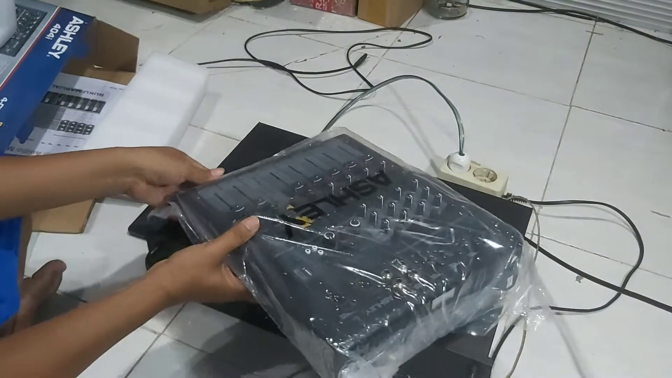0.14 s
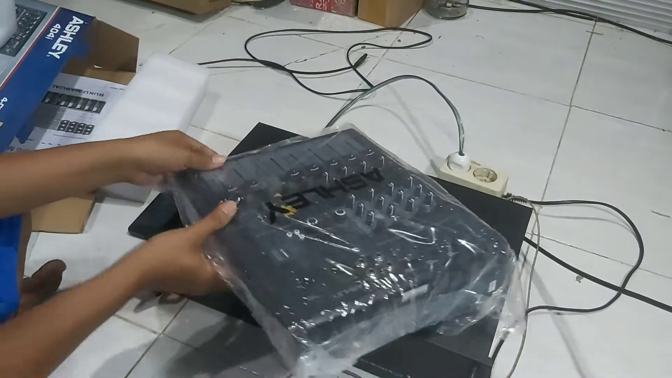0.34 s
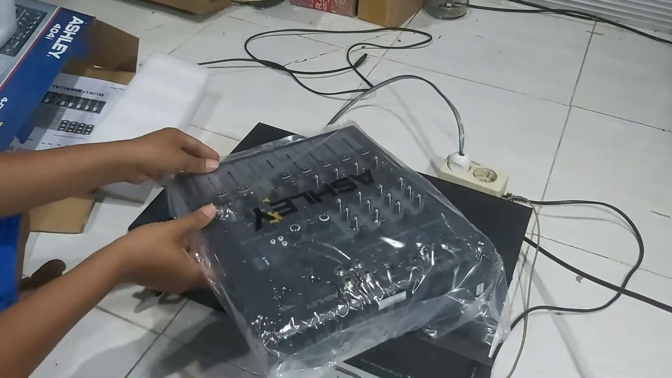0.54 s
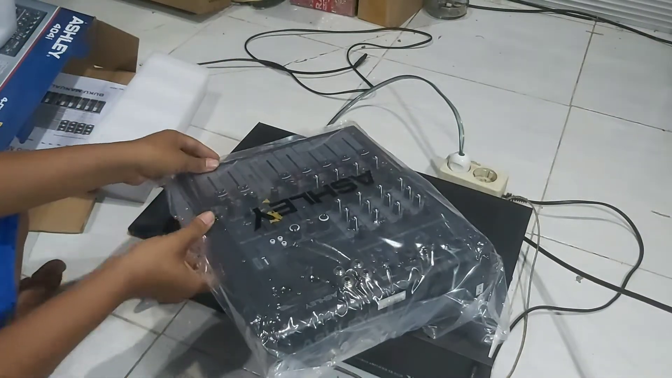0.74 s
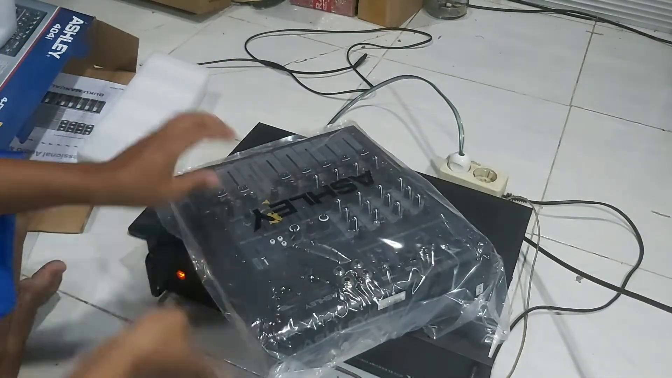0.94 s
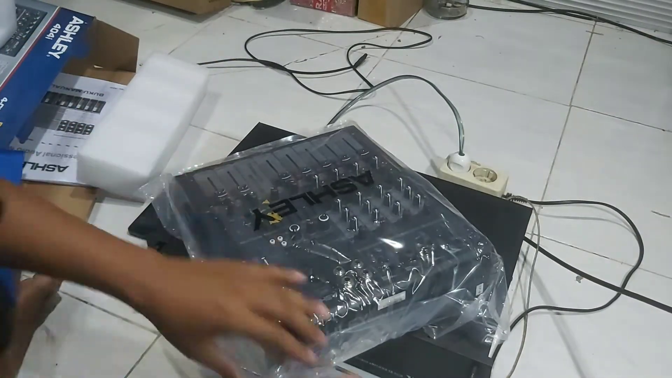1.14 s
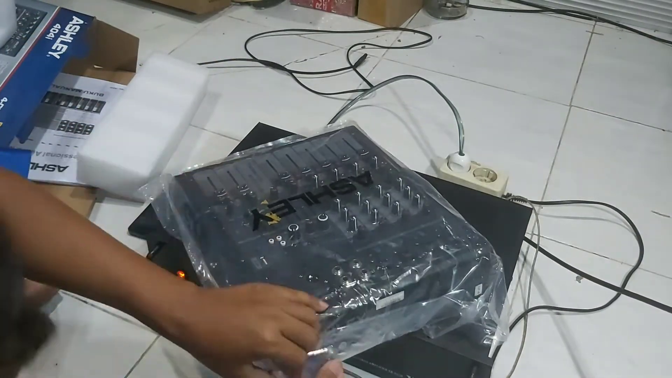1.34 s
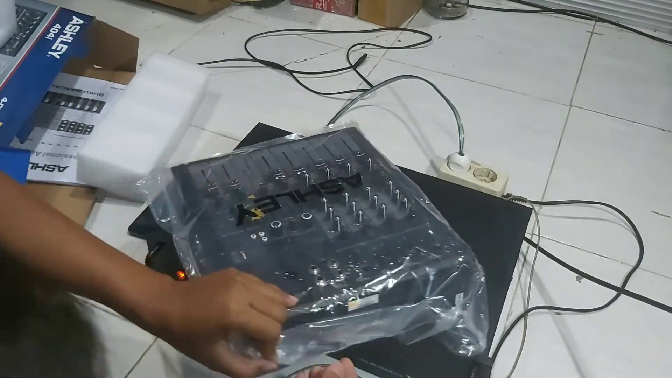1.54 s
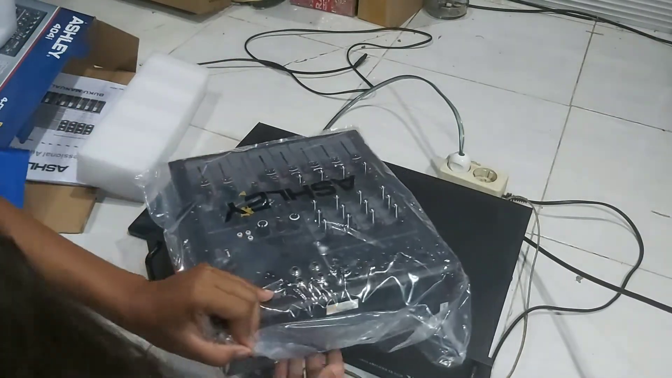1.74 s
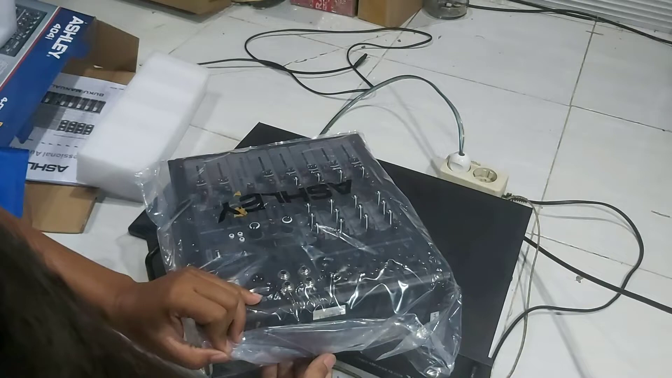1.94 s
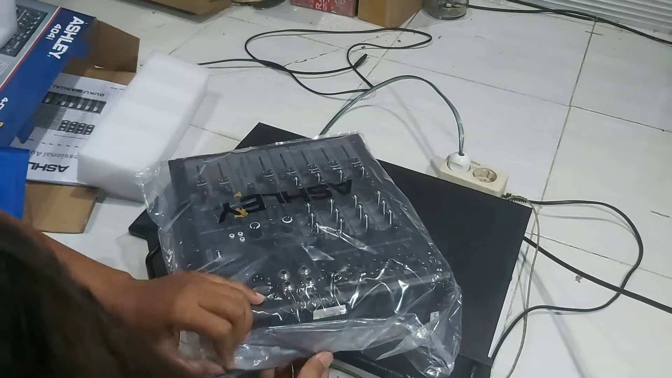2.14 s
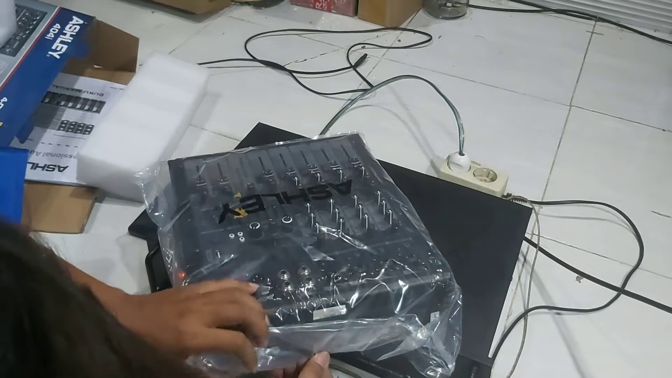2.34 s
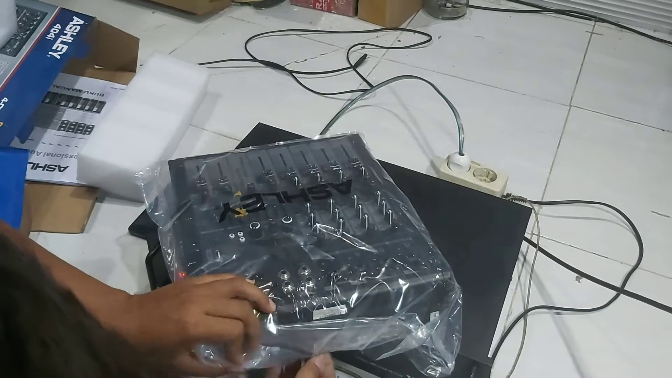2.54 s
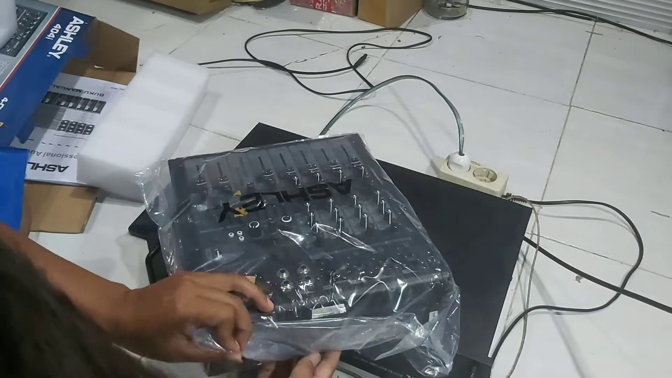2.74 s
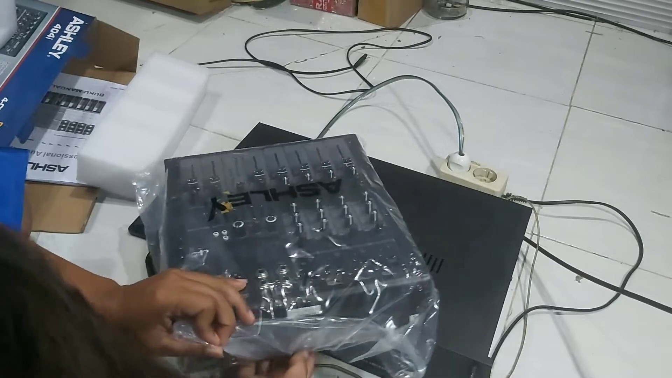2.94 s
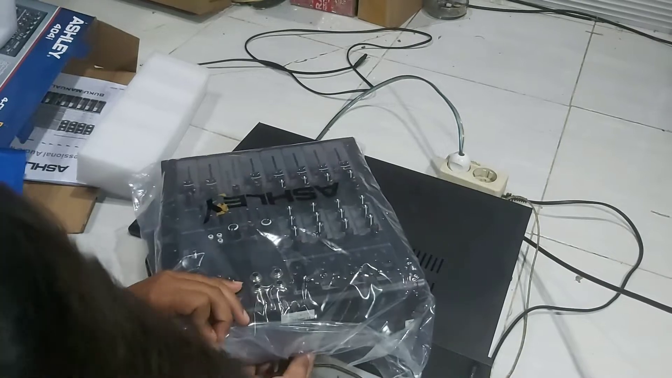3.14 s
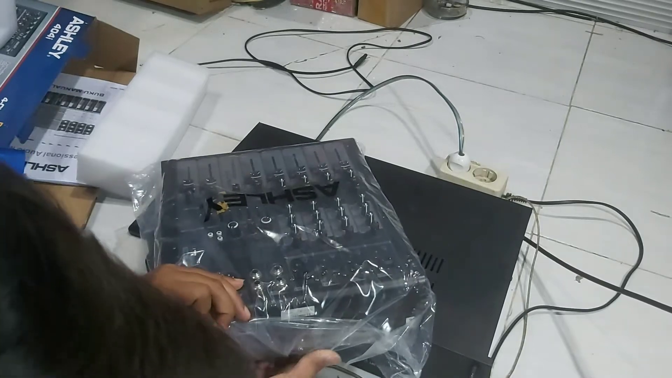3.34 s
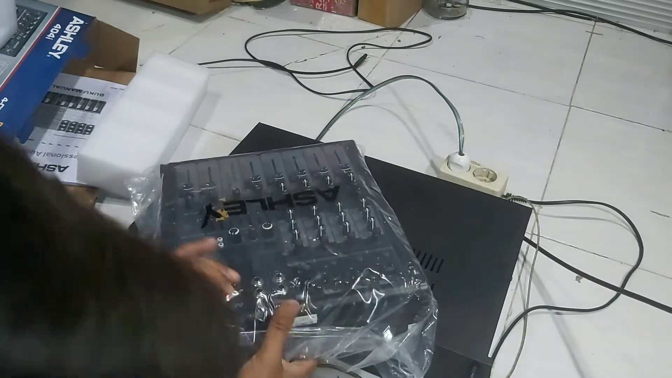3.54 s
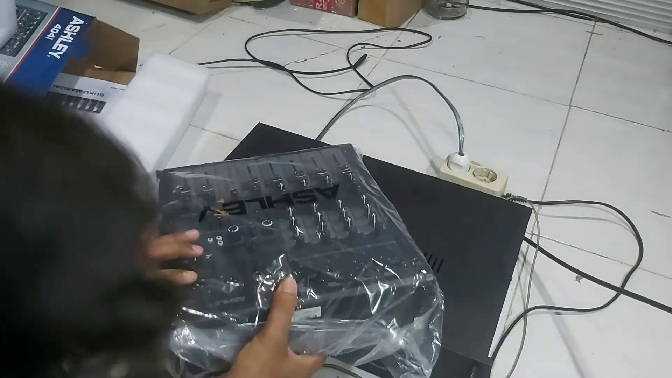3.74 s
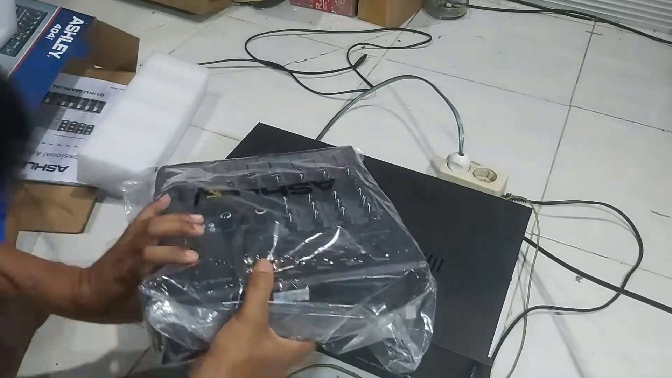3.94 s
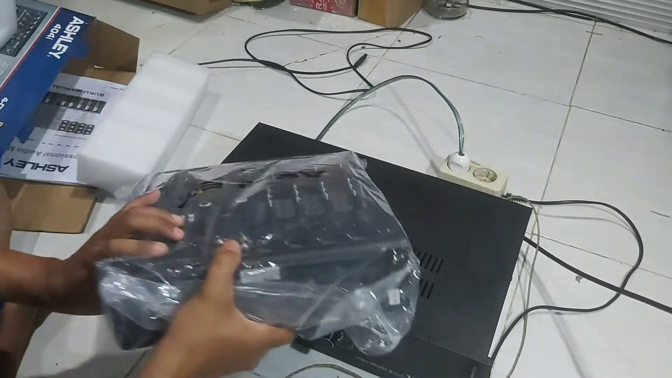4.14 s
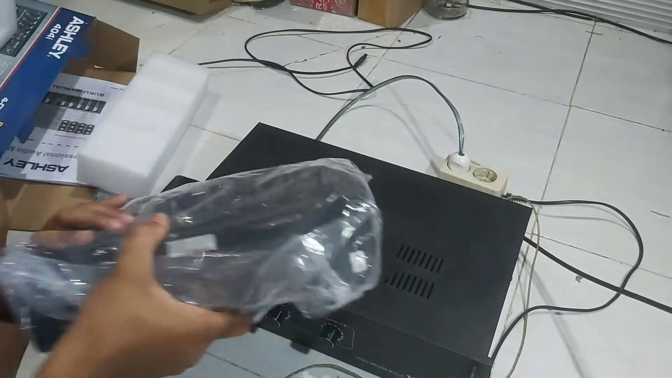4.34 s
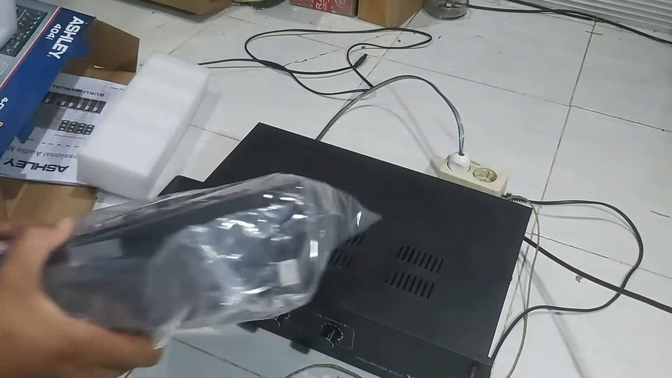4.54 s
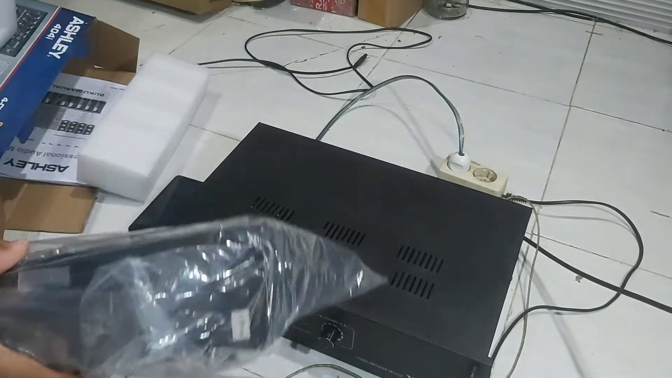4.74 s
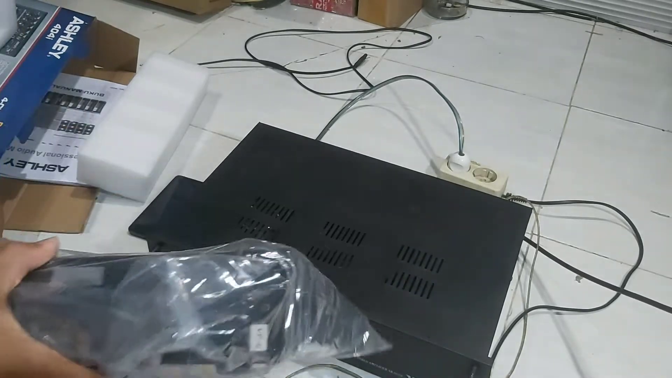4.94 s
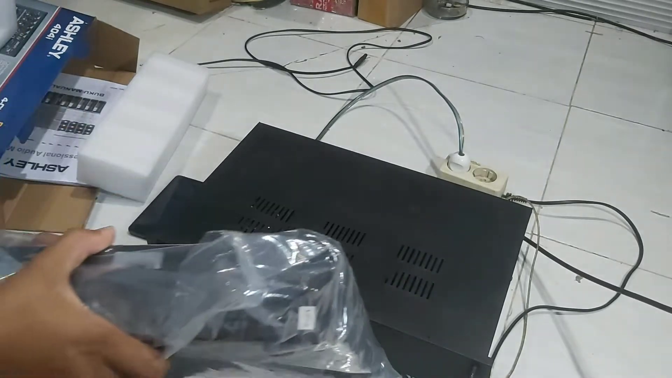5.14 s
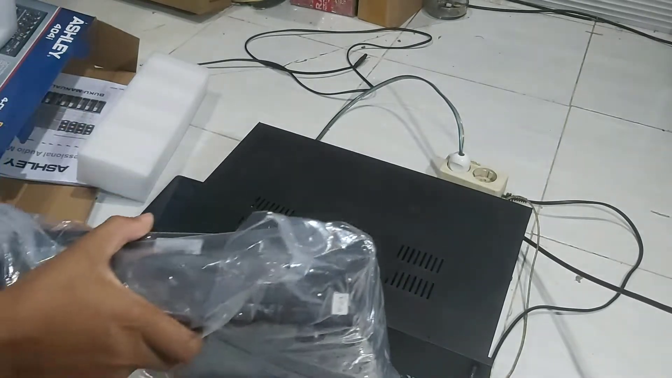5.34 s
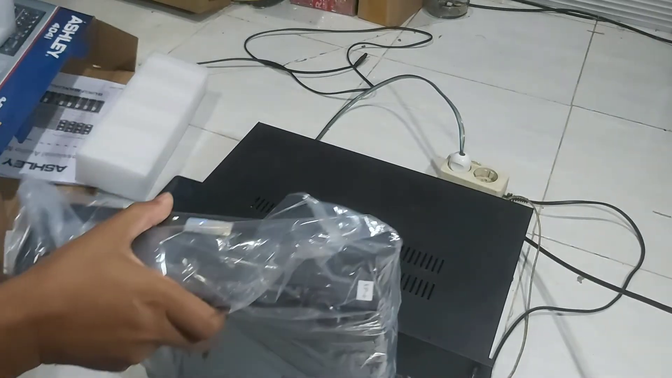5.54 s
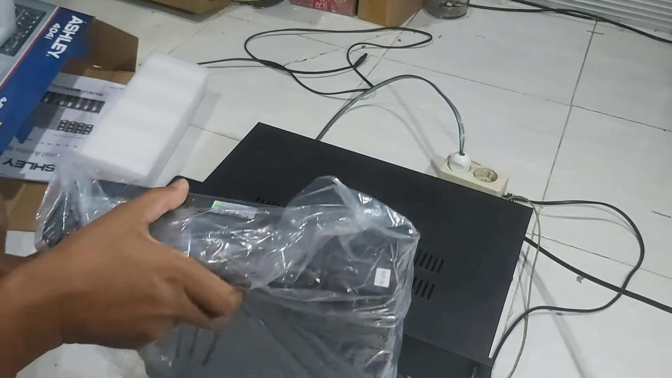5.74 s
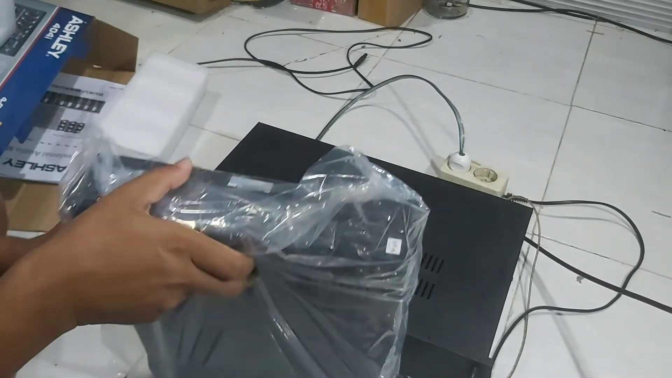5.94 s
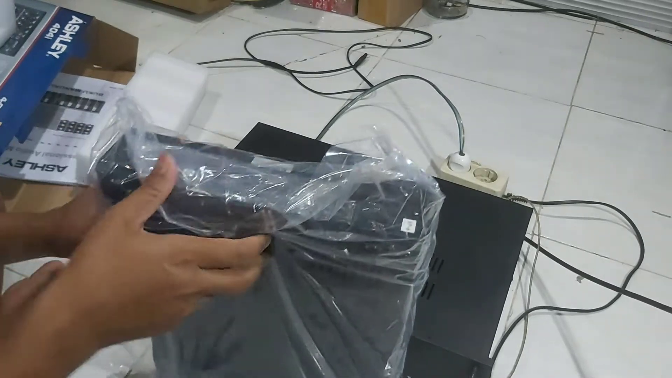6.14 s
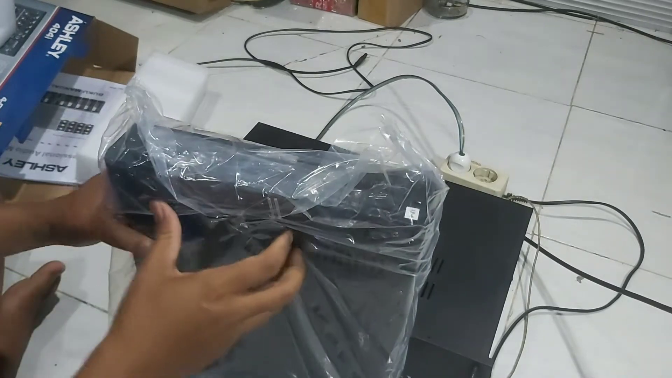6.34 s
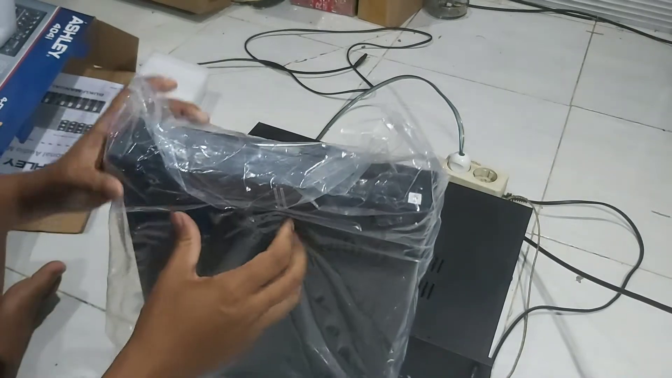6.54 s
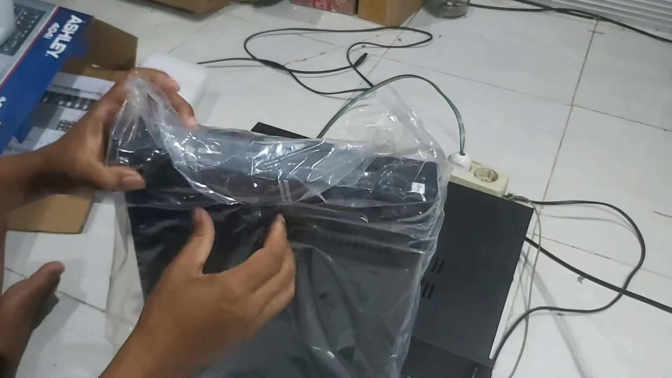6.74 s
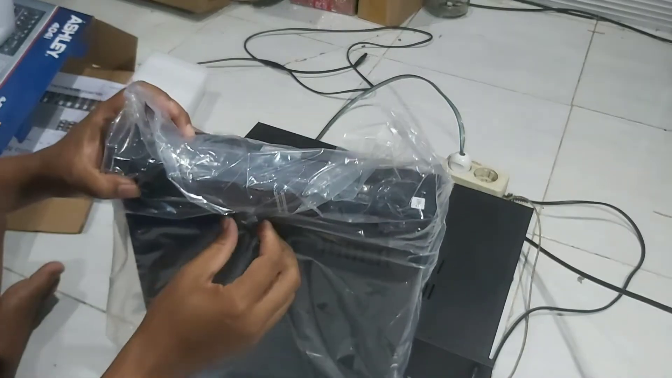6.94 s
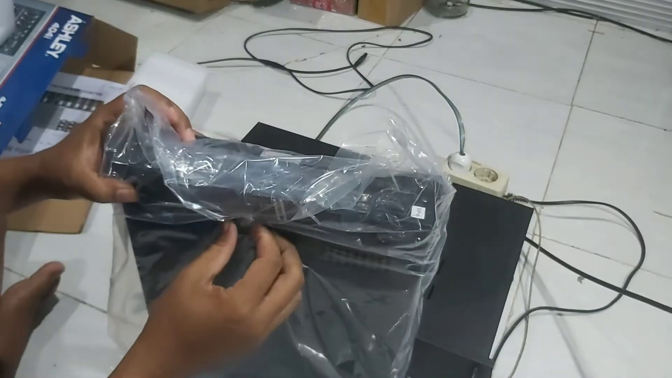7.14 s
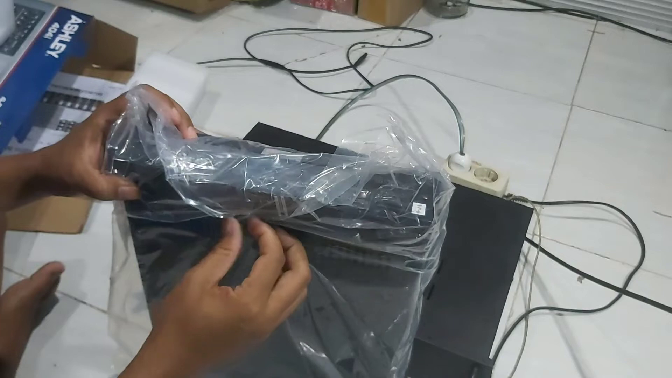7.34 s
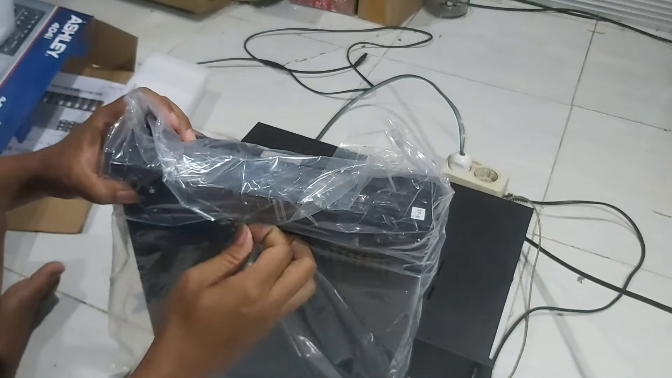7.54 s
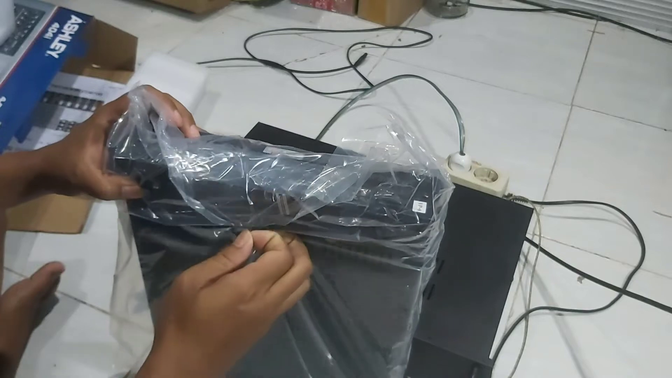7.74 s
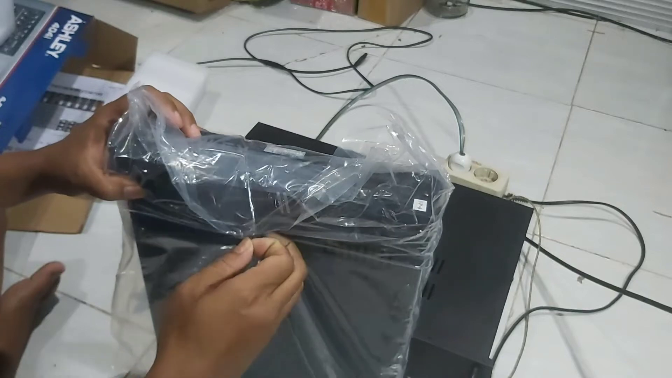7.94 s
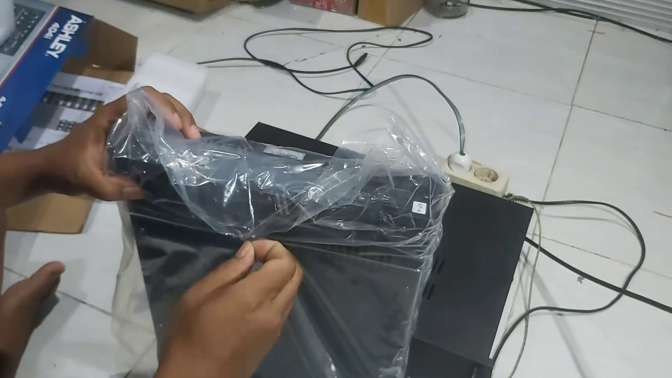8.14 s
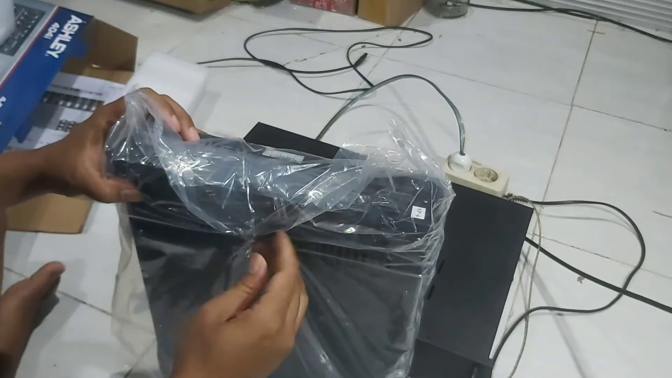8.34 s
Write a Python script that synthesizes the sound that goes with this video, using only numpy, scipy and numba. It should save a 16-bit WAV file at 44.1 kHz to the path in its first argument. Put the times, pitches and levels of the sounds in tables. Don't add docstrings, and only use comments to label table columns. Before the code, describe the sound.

In a small hard-floored room, a heavy box in loose plastic drags and thumps on ringing sheet metal. Dense crinkling comes in uneven clumps with sharp single pops. Several knocks cluster in the middle, with soft low thuds beneath them; afterwards mostly light crackling and ticks remain, with a few muted bumps. A low, wavering fan tone sits behind, picked up by a nearby phone in stereo.

```python
import sys
import numpy as np
from scipy import signal
from scipy.fft import rfft, irfft
from scipy.io import wavfile
from scipy.ndimage import uniform_filter1d
from numba import njit

SR = 44100
rng = np.random.default_rng(int(sys.argv[2]) if len(sys.argv) > 2 else 0)


def invert_db(level):
    return 10 ** (np.asarray(level, dtype=float) / 20)


def to_wav(s):
    ch = np.atleast_2d(s).T
    pcm = np.round(np.clip(ch, -1, 1) * 32767)
    wavfile.write(sys.argv[1], SR, pcm.astype(np.int16))


N = 370440
T = np.arange(N) / SR
STILL_CASING_DB, STILL_FILM_DB = -42, -69


def shape(x, table, scale=1):
    hz, db = np.transpose(table)
    size = x.shape[-1]
    f = np.maximum(np.arange(size // 2 + 1) * SR / size, 1)
    gain = invert_db(scale * np.interp(np.log(f), np.log(hz), db))
    return irfft(rfft(x) * gain, size)


def band(x, lo_hz, hi_hz):
    sos = signal.butter(2, [lo_hz, min(hi_hz, .48 * SR)], "bandpass", fs=SR, output="sos")
    return signal.sosfilt(sos, x)


def unit(x):
    return x / np.sqrt(np.mean(x ** 2))


# f/Hz, likeness [0-1]
PORT_LIKENESS = [(60, 0.8), (130, 0.87), (290, 0.78), (640, 0.49), (1410, 0.06), (3100, 0.06), (6820, 0),
                 (15000, 0.15)]


def pair(size):
    hz, likeness = np.transpose(PORT_LIKENESS)
    likeness = np.clip(likeness, 0, .99)
    mid, side = rng.standard_normal((2, size))
    mid = shape(mid, np.c_[hz, 10 * np.log10(1 + likeness)])
    side = shape(side, np.c_[hz, 10 * np.log10(1 - likeness)])
    return np.array([mid + side, mid - side]) / np.sqrt(2)


def walk(rate):
    hold = int(SR / rate)
    steps = np.repeat(rng.standard_normal(N // hold + 1), hold)
    return 1.323 * uniform_filter1d(uniform_filter1d(steps, hold), hold)[:N]


def swells(rows, rest_db, t):
    s, db, rise, fall = np.transpose(rows)[:, :, None]
    away = np.where(t < s, (s - t) / np.abs(rise), (t - s) / np.abs(fall))
    move_power = invert_db(2 * (db - 20 * away ** 1.18)).sum(0)
    return 10 * np.log10(invert_db(2 * rest_db) + move_power)


@njit
def rings(start, hz, t60, size, phase):
    out = np.zeros(N)
    for k in range(len(start)):
        turn = np.exp(2j * np.pi * hz[k] / SR - np.log(1000) / (t60[k] * SR))
        z = size[k] * np.exp(1j * phase[k])
        for i in range(max(int(start[k]), 0), min(int(start[k] + t60[k] * SR) + 1, N)):
            out[i] += z.real
            z *= turn
    return out


# t/s, peak level/dB, centre f/Hz, ring time/s
BUMPS = [(0.0, -19.5, 302, 1), (0.607, -4, 353, 0.28), (1.259, -25.5, 550, 0.27), (1.995, -17, 283, 0.18),
         (2.173, -29, 288, 0.35), (2.942, -9, 450, 0.28), (3.576, -10.5, 600, 0.17), (3.6, -26, 280, 0.44),
         (3.742, -16, 590, 0.19), (3.954, -24.5, 340, 0.72), (4.443, -15, 300, 0.27),
         (4.458, -11, 460, 0.76), (5.347, -25, 1400, 0.14), (5.355, -19, 159, 0.23), (3.0, -20, 420, 0.36),
         (6.161, -18.5, 666, 0.23), (0.612, -11.5, 1000, 0.19), (4.443, -16, 1040, .25),
         (4.22, -22.5, 590, 0.38), (7.855, -26.5, 334, 0.17)]
# f/Hz, level/dB, relative ring time
CASING_MODES = [(160, 2.5, 0.89), (190, 0.5, 0.84), (253.3, -10.5, 1.5), (283, 0.5, 2.7), (305.2, 3, 1.5),
                (337.7, 3.5, 1.98), (355.4, 4, 0.88), (391, 10, 0.24), (437.3, 3.5, 1.07), (484, -1, 0.57),
                (532.4, 1, 1.8), (577, 3.5, 0.56), (638, 4, 0.34), (696, 6, 0.36), (730, 8.5, 0.32),
                (825, -7, 0.53), (860, -40, 0.19), (1060, -34, 0.12), (1100, -0.5, 1), (1290, 2, 0.89),
                (1598, -3, 0.96), (1870, 7.5, 0.23)]


def bumps():
    hz, mode_db, ring = np.transpose(CASING_MODES)
    contact_s = 0.00775
    out = np.zeros(N)
    for (s, db, centre_hz, t60), chance in zip(BUMPS, rng.random((len(BUMPS), 2, len(hz)))):
        start = (s + chance[0] * contact_s) * SR
        detuned_hz = hz * (1 + 0.024 * (chance[1] - .5))
        near_db = -6.0 * np.abs(np.log2(hz / centre_hz))
        size = invert_db(db + mode_db + near_db - 11.0)
        out += rings(start, detuned_hz, 0.43 * t60 * ring, size, 0 * hz - np.pi / 2)
    return out


# t/s of most pressure, drag level/dB, rise/s, fall/s
SLIDES = [(0, -24, .1, 0.31), (.4, -33.5, 1, 1), (.63, -17, 0.041, 0.15), (1.46, -32, 0.21, 0.43),
          (2.2, -35.5, 0.95, 0.23), (2.58, -36, 0.16, 0.45), (2.96, -25, 0.083, 0.23),
          (2.85, -31.5, 0.12, .15), (3.62, -22, 0.068, 0.18), (4.25, -23.5, 0.19, 0.18),
          (4.5, -23.5, 0.12, 0.35), (5.4, -44, 0.15, 0.69), (6.6, -33.5, 0.44, 0.19)]


def drag():
    hz, mode_db, ring = np.transpose(CASING_MODES)
    scrape = rng.standard_normal(N) * invert_db(2.75 * walk(30))
    poles = np.exp(2j * np.pi * hz / SR - np.log(1000) / (0.17 * ring * SR))
    rub = np.zeros(N)
    for db, pole in zip(mode_db, poles):
        rub += invert_db(db) * signal.lfilter([1], [1, -pole], scrape).imag
    low_scuff = invert_db(-3) * unit(band(band(scrape, 390, 1025), 390, 1025))
    high_scuff = invert_db(-15.5) * unit(band(scrape, 990, 2350))
    pressure_db = np.interp(T, T[::100], swells(SLIDES, STILL_CASING_DB, T[::100]))
    return invert_db(pressure_db - 4.0) * (unit(band(rub, 140, 970)) + low_scuff + high_scuff)


# t/s, level/dB, f/Hz, ring time/s
PANELS = [(0.6, -6, 300, 0.3), (0.61, -10, 441.4, 0.18), (.68, -18, 365, 0.3), (1.98, -20, 284, 0.2),
          (2.13, -29, 280, 0.14), (2.96, -10, 288, 0.15), (3.585, -14, 283, 0.39),
          (3.645, -13.5, 278, 0.29), (3.637, -20, 430, 0.17), (3.05, -25.5, 335, 0.45),
          (3.579, -21.5, 190, 0.13), (.69, -23, 253, 0.72), (2.97, -19, 255, .3), (4.47, -23, 290, .9),
          (.01, -19.5, 305, .5), (3.744, -17.5, 700, 0.1), (3.744, -18, 530, 0.069), (4.52, -18, 332, 0.32),
          (4.215, -21, 468, 0.38), (4.225, -23, 750, .25), (4.24, -18, 338.5, 0.31), (4.235, -23, 545, .3),
          (4.441, -18, 160, 0.2), (4.462, -14.5, 342, .6), (4.462, -17.5, 572, 0.25),
          (5.3, -24.5, 157, 0.13), (6.161, -21.5, 660, 0.064), (6.161, -25.5, 334.6, 0.18),
          (6.531, -29.5, 331, 0.33)]


def panels():
    s, db, hz, t60 = np.transpose(PANELS)
    return band(rings(s * SR, hz, t60, invert_db(db), 0 * s - np.pi / 2), 130, 1030)


def casing():
    struck = bumps() + panels()
    return band(band(struck, 110, 5300), 89, 6000) + drag()


# f/Hz, level/dB per Hz
FILM_COLOUR = [(400, 13.5), (1200, 4.5), (2000, 0.5), (4000, -6.5), (6000, -13), (7500, -25), (10000, -19),
               (12200, -7.5), (15000, -13), (16500, 5.5)]
# from f/Hz, to f/Hz, level/dB
FOLD_BANDS = [
    (431, 1570, -8.5),
    (1500, 2650, -7.5),
    (2404, 3980, -8),
    (4210, 6720, -8.5),
    (6114, 10250, -12.5),
    (10200, 14950, -12),
]


def creases(s, db, tilt_db, ring_hz, pan_db):
    at = np.clip((s * SR).astype(int), 0, N - 1)
    noise, out = shape(pair(N), FILM_COLOUR), 0
    for lo_hz, hi_hz, share_db in FOLD_BANDS:
        octave = np.log2(np.sqrt(lo_hz * hi_hz) / 3100)
        ring_db = 9.0 * np.exp(-(np.log2(ring_hz / 3100) - octave) ** 2 / 0.62)
        crease_db = db + share_db + tilt_db * octave + ring_db
        power = np.zeros((2, N))
        for side in (0, 1):
            np.add.at(power[side], at, invert_db(2 * crease_db + (2 - 2 * side) * pan_db))
        tick, burst = (signal.lfilter([1], [1, -np.exp(-1000 / (ms * SR))], power)
                       for ms in (0.11, 2.77))
        envelope = np.sqrt(tick + invert_db(-26) * burst)
        crackle = envelope * unit(band(noise, lo_hz, hi_hz))
        out = out + band(crackle, 0.91 * lo_hz, 1.015 * hi_hz)
    return out


# t/s of most strain, rustle level/dB, rise/s, fall/s
GRIPS = [(0, -30.5, .1, 0.078), (.274, -30, 0.39, 0.46), (.47, -34, 0.18, .2), (1.7, -34.5, 0.41, 0.2),
         (.595, -23.5, 0.13, 0.085), (.958, -47.5, 0.26, 0.1), (1.272, -33, 0.041, 0.44),
         (1.445, -28.5, 0.2, 0.28), (5.03, -37, 0.13, 0.085), (2.195, -29, 0.068, 0.14),
         (2.62, -34.5, 0.23, 0.25), (2.93, -24.5, 0.061, 0.19), (3.04, -36, 0.21, 0.063),
         (3.377, -36.5, 0.11, 0.041), (3.607, -28, 0.088, 0.2), (3.976, -31, 0.7, 0.37),
         (4.3, -32.5, 0.079, 0.13), (4.445, -26.5, 0.057, 0.18), (4.7, -41.5, 0.44, 0.079),
         (5.2, -51, 0.26, 0.14), (3.25, -55, .1, 0.22), (2.86, -31, 0.078, 0.28),
         (4.95, -34.5, 0.073, 0.15), (1.98, -37.5, 0.22, 0.14), (5.276, -37.5, 0.01, 0.14),
         (5.403, -35, 0.08, 0.076), (5.532, -35, 0.041, 0.33), (5.7, -37, 0.15, 0.068),
         (5.907, -32.5, 0.035, 0.3), (6.181, -39.5, 0.31, 0.1), (6.74, -30.5, 0.55, 0.18),
         (7.1, -48.5, 0.32, 0.31), (7.34, -45, .02, 0.41), (7.39, -43.5, 0.044, 0.19),
         (7.638, -40.5, 0.061, 0.36), (7.917, -35.5, 0.22, 0.17), (8.092, -35.5, 0.077, 0.056),
         (8.266, -29, 0.063, 0.047)]


def rustle(count=8000):
    chance = rng.random((count, 5)).T
    s = chance[0] * N / SR
    clump_db = 2.5 * walk(40)[(s * SR).astype(int)]
    size_db = np.minimum(clump_db - 3.6 * np.log(1 - chance[1]), 8.5)
    pressure_db = swells(SLIDES, STILL_CASING_DB, s) - STILL_CASING_DB
    tilt_db = -1.5 - .13 * pressure_db + 6 * (chance[2] - .5)
    db = swells(GRIPS, STILL_FILM_DB, s) + size_db - 1.0
    ring_hz = 900 * 2 ** (4.8 * chance[3])
    return s, db, tilt_db, ring_hz, 8 * (chance[4] - .5)


# t/s, level/dB
FAN_LEVEL = [
    (0, -69),
    (3.3, -56),
    (3.7, -34.5),
    (4.4, -42),
    (6, -46),
    (8.4, -45.5),
]
# f/Hz, level/dB per Hz
AIR_COLOUR = [(18, -43), (30, 1.5), (76, -10), (190, -10), (323, -2), (467, -8), (624, -11.5), (928, -15),
              (1120, -8.5), (1450, -26), (3860, -78), (8750, -77), (15200, -33), (16500, -64)]


def fan():
    blade_hz = 335 + 1.806 * walk(30)
    phase = 2 * np.pi * np.cumsum(blade_hz) / SR
    level = invert_db(np.interp(T, *np.transpose(FAN_LEVEL)) + 1.5 + 0.89 * walk(13))
    tone = level * (np.sin(phase) + invert_db(-11.0) * np.sin(2 * phase))
    air = invert_db(-44.5 + 1.0 * walk(2.76)) * unit(shape(pair(N), AIR_COLOUR))
    return tone + air


# t/s, peak level/dB, tilt/dB per octave,
# ring f/Hz
SNAPS = [(0.1146, -19.5, 2, 2040), (0.1376, -18, 3.5, 3040), (0.177, -16.5, -0.5, 3750),
         (0.23, -22, 5.5, 1620), (0.248, -10.5, 3.5, 1380), (0.284, -14, 5.5, 2320),
         (0.4434, -20, 6.5, 1060), (0.4732, -13.5, 1, 2120), (0.5557, -10.5, 2.5, 1020),
         (0.5753, -12.5, 6.5, 3480), (0.9698, -25, 3.5, 1260), (1.0877, -28, -3.5, 2100),
         (1.075, -40, -2, 1700), (1.2296, -27, -0.5, 6660), (1.264, -22.5, 0, 2980),
         (1.29, -18.5, 2.5, 1330), (1.364, -23, 3, 1870), (1.383, -15.5, 4, 1930),
         (1.4306, -14, 7, 1880), (1.516, -18.5, 8, 1800), (1.636, -16.5, 4, 3540),
         (1.6903, -21, 0.5, 1470), (2.074, -29, 2, 1610), (2.178, -10.5, 2, 1670),
         (2.2543, -23, 3, 2080), (2.435, -27, 5.5, 4700), (2.4584, -25, 6.5, 1760),
         (2.5276, -22.5, 5, 1420), (2.6429, -20.5, 5.5, 1070),
         (2.817, -19.5, 2, 1010), (3.0203, -15.5, 0.5, 1360), (3.0358, -18, 7, 1640),
              (3.308, -33, -2, 1540), (7.899, -18, 2, 1600), (3.566, -21, 3, 1200), (3.5907, -9.5, 3, 1000),
              (3.719, -18, 2, 2080), (3.7434, -11.5, 6, 2580), (3.7987, -17, -0.5, 1100),
              (3.8567, -27, 5.5, 6620), (3.8743, -21.5, 7.5, 2580), (3.9603, -16.5, 5, 2340),
              (4.0177, -21, 7, 1500), (4.056, -19, 3, 3940), (4.42, -21, 2, 2560), (4.4394, -5.5, -1, 1100),
              (4.7126, -25, 5.5, 3080), (4.904, -27, 3, 3670), (5.027, -20.5, 1.5, 1690),
              (5.270, -25, 1, 5830), (5.349, -26, -3, 1130), (5.3821, -23, 3.5, 2870),
              (5.4938, -23, 4, 1290), (5.542, -28.5, 8, 6300), (5.5696, -20, 1.5, 1720),
              (5.6221, -13.5, 1, 1220), (5.695, -13, -1, 1380),
         (5.844, -37.5, -9, 1732), (5.8838, -25, 3, 2080), (5.9183, -20, 7.5, 1320),
              (5.9783, -14, 2.5, 1790), (6.1621, -11.5, -2.5, 1580), (6.3786, -16.5, 2.5, 5900),
              (6.5472, -23, 1, 2080), (6.5598, -17.5, 1, 3000), (6.6651, -20, -4, 3120),
              (6.7473, -24, -1, 2100), (6.76, -16.5, 6, 1100), (7.0867, -19, 3.5, 1180),
              (7.324, -34, 5, 1070), (7.378, -28, 6, 4410), (7.4051, -20, 0.5, 1810), (7.572, -37, 9, 2900),
              (7.598, -26, 3, 2010), (7.618, -24, 7, 3780), (7.687, -21.5, 4.5, 2590),
              (7.741, -10, 0.5, 11800), (7.7773, -22, -1.5, 2520), (7.8155, -19, -1, 3100),
              (7.904, -18, -2.5, 3250), (8.035, -23, -2, 1950), (8.072, -23.5, 2.5, 1890),
              (8.149, -27, -1.5, 2160), (8.2385, -19.5, -0.5, 1100), (8.354, -24.5, 0.5, 2070),
         (0.8644, -32.5, -1, 2226), (1.7695, -23, 1.5, 1880), (2.326, -27, 4, 5000),
               (2.925, -12.5, 4.5, 970), (3.204, -30.5, 0.5, 6100), (3.368, -27, -7.5, 3040),
               (4.858, -36, -3, 3140), (5.187, -34, -3, 5000), (7.512, -38.5, 5.5, 9000),
               (8.254, -34, 13, 5000),
         (0.0846, -32, 9, 1610), (0.2075, -27, 4, 3470), (0.3626, -22.5, 3.5, 1930),
               (0.5142, -18, 1, 2700), (0.8081, -50, -8, 2320), (0.82, -36, 3, 2270),
               (0.9178, -30.5, -2, 1500), (1.4409, -16, 5, 1910), (1.5558, -17.5, 3, 1920),
               (1.6056, -20, 5, 1980), (1.719, -23, 4, 1800), (1.828, -35, -4, 3510),
               (1.8472, -23, -1.5, 2100), (1.883, -25.5, -1, 1530), (1.9108, -27, -0.5, 2700),
               (1.933, -29, 0, 1760), (1.955, -36, 3, 2710), (1.978, -27.5, 1.5, 2340),
               (1.9954, -25.5, -6, 1710), (2.0592, -33, -1, 2220), (2.1017, -24, 1, 1570),
               (2.1415, -33, 4.5, 1520), (2.296, -23.5, 2, 2940), (2.378, -28.5, -1.5, 1640),
               (2.4947, -35, 2, 1870), (2.5624, -30, 2, 1620), (2.574, -25, 5.5, 2070),
               (2.6134, -29.5, 7, 6140), (2.6955, -29, 9, 3020), (2.7373, -26, 3.5, 2070),
               (2.8488, -26, 10.5, 2370), (2.8683, -15.5, 4, 1650), (3.0734, -17.5, -4, 4150),
               (3.1782, -37, 5, 1960), (3.2884, -46, 1, 1560), (3.316, -27, 1.5, 1580),
               (3.3375, -26.5, -1, 1601), (3.3538, -29, 4, 1610), (7.73, -30, 1, 9000),
               (3.5114, -27, 3, 2170), (3.696, -25, -1, 1730), (3.917, -27, 9, 2530),
               (4.1165, -33.5, -6, 2010), (4.1754, -29, 5, 1730), (4.2898, -24, 4, 1590),
               (4.344, -28, -1, 4200), (4.3849, -36, 2, 1930),
         (4.5516, -33, -1, 3000), (4.5879, -21, -5.5, 3740), (4.676, -33, 3, 1720),
              (4.881, -37, -3, 3240), (4.9264, -32, 0, 4096), (4.9447, -31, 1.5, 5530),
              (4.9596, -25, -1, 1920), (5.0065, -33, 2, 2050), (5.4116, -30, -1, 3300),
              (5.683, -23, 1, 1520), (5.718, -21, -3, 1620), (5.8963, -27.5, 9, 1850),
              (5.905, -26, -2, 1950), (6.0703, -29, 3, 1880), (6.105, -27.5, 2, 1820),
              (6.223, -25.5, 3, 1940), (6.2622, -36, 0, 2320), (6.2816, -38, -2, 2190),
              (6.321, -36, 2, 1900), (6.356, -35, 0, 5530), (6.4228, -30, 5, 1960),
              (6.4508, -28, 3.5, 1800), (6.7192, -18, 4, 2400), (6.8329, -33, -4, 3460),
              (6.857, -27, -2, 1980), (6.943, -33, -3, 2770), (6.9586, -33, -2, 2100),
              (7.0035, -34, 0, 2660), (7.029, -34, -1, 1800), (7.0715, -35, -3, 3130),
              (7.1368, -31, -7.5, 2880), (7.1815, -39, -7, 1820), (7.701, -25.5, 1.5, 9050),
              (7.239, -40, 7, 1880), (7.3345, -29, 3, 1920), (7.6595, -25.5, -4, 3430),
              (7.8571, -23, -3.5, 1810), (7.9312, -23.5, -2, 2060), (7.954, -23.5, 3, 2010),
              (7.9905, -22, 1.5, 2090), (8.0564, -28, -2, 2000), (8.079, -20.5, 2, 1870),
              (8.228, -25, -2, 1540)]


def snaps():
    rows = SNAPS
    s, db, tilt_db, ring_hz = np.transpose(rows)
    return s, db + 2.5, tilt_db, ring_hz, 5 * (rng.random(len(s)) - .5)


def pings(s, db, ring_hz):
    return rings(s * SR, ring_hz, 26 / ring_hz, invert_db(db - 11), 0 * s)


# t/s, peak level/dB, f/Hz
THUDS = [(0.618, -41, 139), (0.69, -32, 164), (2.814, -36.5, 115), (2.971, -36, 117), (3.589, -30, 166),
         (4.459, -27, 169), (5.396, -32, 138), (6.217, -34.5, 142), (6.627, -31.5, 120), (7.416, -44, 51.1),
         (0.615, -39, 58), (0.65, -44, 119), (2.95, -43, 60), (3.58, -36, 59.7), (3.599, -43, 128),
         (4.449, -31.5, 55.7)]


def thuds():
    s, db, hz = np.transpose(THUDS)
    blow = rings(s * SR, hz, 7 / hz + 0.062, invert_db(db + 8.0), 0 * hz - np.pi / 2)
    return band(band(blow, 31, 210), 31, 210)


# t/s of most speed, level/dB, rise/s, fall/s
GLIDES = [
    (4.23, -48, 0.057, 0.22),
    (5.11, -47, 0.065, 0.2),
]


def glide():
    swish = band(band(pair(N), 5400, 6900), 5400, 6900)
    return invert_db(swells(GLIDES, -97, T) + 1.5 * walk(24.96)) * unit(swish)


def room(x):
    low_t60_s, treble_t60_s = 0.49, 0.44
    t = T[:int(.9 * SR)]
    noise = pair(len(t))
    low = band(noise, 52, 1220) * invert_db(-60 * t / low_t60_s)
    treble = band(noise, 960, 15900) * invert_db(-60 * t / treble_t60_s)
    onset = 1 - np.exp(-t / 0.00044)
    early_boost = 1 + 2.0 * np.exp(-t / 0.014)
    tail = (low + treble) * onset * early_boost
    tail = tail / np.sqrt(np.sum(tail ** 2) / 2)
    return invert_db(-11) * signal.fftconvolve(x[None], tail, axes=1)[:, :N]


def scene():
    body = casing() + thuds()
    single = snaps()
    s, db, _, ring_hz, _ = single
    film = creases(*np.concatenate([rustle(), single], axis=1)) + pings(s, db, ring_hz)
    near = np.array([np.roll(body, 3), body])
    echoes = room(film[0] + film[1] + invert_db(7.5) * body)
    return film + glide() + invert_db(-0.5) * near + echoes + fan()


def roll_off(x):
    return signal.sosfilt(signal.butter(12, 16630, fs=SR, output="sos"), x)


# f/Hz, left minus right level/dB
PORT_COLOUR = [(60, -2.5), (110, 2), (200, -2), (380, 0), (700, 1), (1290, 0.5), (2380, -2.5), (4400, -1.5),
               (8120, -11.5), (15000, 3)]


def record(dry):
    ports = np.array([shape(dry[0], PORT_COLOUR, 0.59), shape(dry[1], PORT_COLOUR, -0.71)])
    bass_cut = signal.butter(4, 45, "highpass", fs=SR, output="sos")
    treble_cut = signal.ellip(8, .2, 70, 15700, fs=SR, output="sos")
    clipped = np.clip(signal.sosfilt(bass_cut, ports), -1, 1)
    mix = signal.sosfilt(treble_cut, clipped)
    return roll_off(mix)


dry = scene()
out = record(dry)
to_wav(out)
```